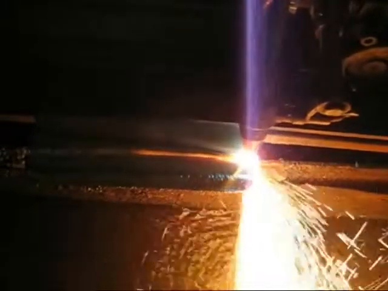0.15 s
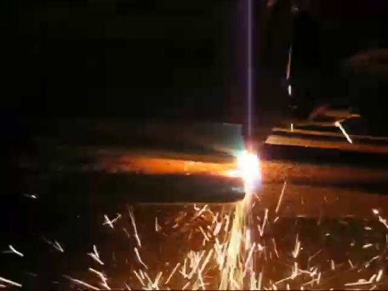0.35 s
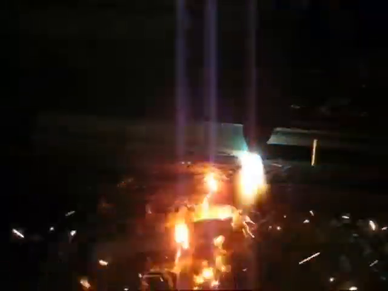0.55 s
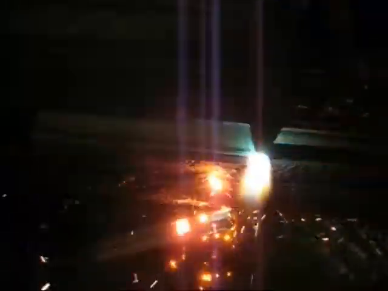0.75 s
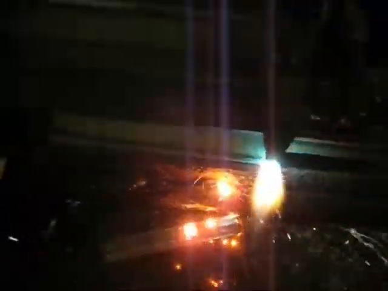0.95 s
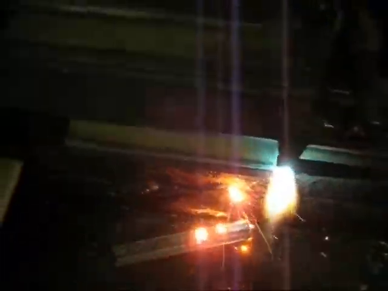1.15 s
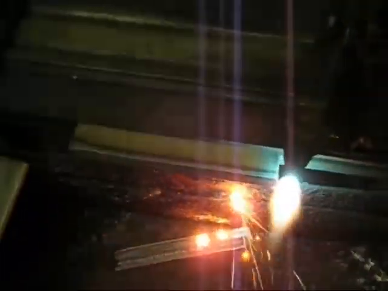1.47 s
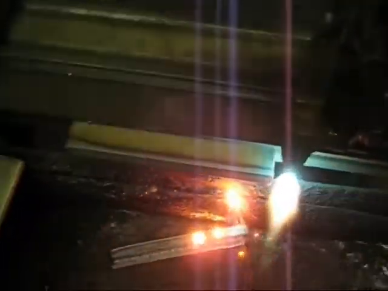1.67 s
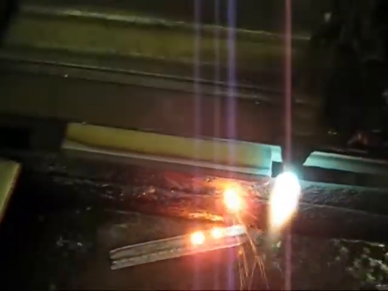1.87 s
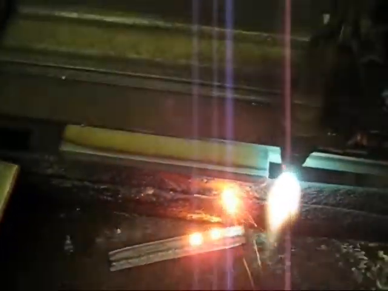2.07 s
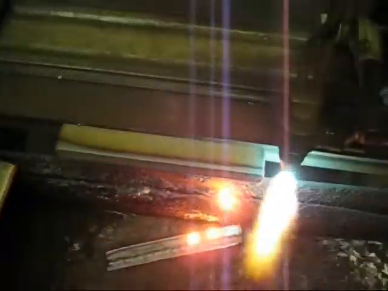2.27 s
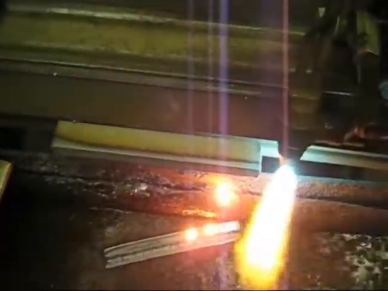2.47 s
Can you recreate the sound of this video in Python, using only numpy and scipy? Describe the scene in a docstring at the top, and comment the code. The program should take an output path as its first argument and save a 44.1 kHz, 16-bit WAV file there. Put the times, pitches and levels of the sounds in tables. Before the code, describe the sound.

A cutting torch's oxygen jet hisses close by, dense, bright and breathy, rising slightly in the first 0.15 seconds. After a faint tick at 0.4, a steel offcut clanks down at about 0.5 in a tight cluster of dull ringing blows, with a short workshop tail. The hiss holds steady, its whistly colour shifting, over barely audible low hum. Around 2.25 it shuts off into a darker, fluttering flame roar until the end.

```python
"""An oxy-fuel torch in a workshop, heard by a single microphone. First an oxygen jet hisses through nozzle
and kerf (filtered noise, resonances, echoes) over a faint wavering hum and rumble. From 0.4 s the cut-off
steel piece hits the floor in a burst of blows (ringing modes, noise cracks, room tail). Near 2.24 s the jet is
shut and the open flame roars (fluttering noise). Gain control turns down whatever rises over its threshold."""
import sys
import numpy as np
from scipy import signal
from scipy.fft import rfft, irfft, next_fast_len
from scipy.io import wavfile
from scipy.ndimage import uniform_filter1d

SR = 44100
rng = np.random.default_rng(int(sys.argv[2]) if len(sys.argv) > 2 else 0)


def volts_from_db(level):
    """Convert decibel levels to linear amplitude ratios."""
    exponent = np.asarray(level, float) / 20
    return 10 ** exponent


def digitize_waveform(pressure):
    """Quantize a signal to 16-bit integers and store it at the path in sys.argv[1].

    Rows of a 2-D input are taken as channels; values are limited to [-1, 1].
    """
    field = np.atleast_2d(pressure).T
    bounded = np.clip(field, -1, 1)
    quanta = np.round(bounded * 32767).astype(np.int16)
    wavfile.write(sys.argv[1], SR, quanta)


N = 114660
T = np.arange(N) / SR


def set_rms(x, rms_db):
    """Scale to an rms level."""
    return x * volts_from_db(rms_db) / np.sqrt(np.mean(x ** 2))


def curve(table, col=1):
    """A table column joined linearly in time."""
    rows = np.array(table, float)
    return np.interp(T, rows[:, 0], rows[:, col])


def walk(rate_hz):
    """Random levels held 1 / rate_hz and slewed twice; spread near 1."""
    hold = max(int(SR / rate_hz), 1)
    steps = np.repeat(rng.standard_normal(N // hold + 1), hold)
    slewed = uniform_filter1d(uniform_filter1d(steps, hold), hold)
    return 1.3 * slewed[:N]


def ramp(start_s, length_s):
    """A smooth step from 0 to 1."""
    return np.sin(np.pi / 2 * np.clip((T - start_s) / length_s, 0, 1)) ** 2


def decay(t, t60_s):
    """Exponential decay by 60 dB in t60_s."""
    return np.exp(-np.log(1000) * t / t60_s)


def ring(x, hz, width_hz):
    """A resonance with gain 1 at its centre."""
    return signal.lfilter(*signal.iirpeak(hz, hz / width_hz, SR), x)


def ring_twice(x, hz, width_hz):
    """Two equal resonances in series: steeper skirts, each width_hz wide."""
    return ring(ring(x, hz, width_hz), hz, width_hz)


def turbulence(spectrum, shared_db, own_db, gust_hz, flicker_hz):
    """Noise of rms near 1 in half-octave-spaced bands that gust together and flicker alone."""
    rows, size = np.array(spectrum, float), next_fast_len(N)
    octave = np.log2(np.arange(size // 2 + 1) * SR / size + 1)
    top_octave = np.log2(rows[-1, 0])
    shape_db = np.interp(octave, np.log2(rows[:, 0]), rows[:, 1])
    shaped = rfft(rng.standard_normal(size)) * volts_from_db(shape_db)
    gust_db, out = shared_db * walk(gust_hz), 0
    for centre in np.arange(3.5, top_octave + 1, .5):
        overlap = np.clip(1 - abs(octave - centre) * 2, 0, 1)
        band = irfft(shaped * overlap, size)[:N]
        out = out + band * volts_from_db(gust_db + own_db * walk(flicker_hz))
    return set_rms(out, 0)


def jet():
    """Turbulent hiss with breathy resonances, its treble mirrored by the steel; it dies when the valve shuts."""
    # hiss spectrum: f/Hz, relative density/dB per Hz
    hiss_spectrum = [(53, -62), (90, -44), (110, -25), (336, -17), (615, -15), (671, -10.5), (1230, -9),
                     (1590, -7), (1890, -3), (2850, -5.5), (3610, -1.5), (4890, -5.5), (6070, -3),
                     (9000, -4), (11100, -7), (13500, -11), (15700, -20.5)]
    # jet loudness: t/s, level/dB before the fixed lift
    jet_level = [(0.0, -27.5), (0.1, -24), (0.14, -21), (0.53, -21), (0.54, -25), (0.64, -20), (1.36, -20),
                 (2.2, -21.5), (2.24, -21.5)]
    # jet resonances: f/Hz, width/Hz of each of two passes, level/dB re unlifted hiss
    whistles = [(1234, 77, -24.5), (2406, 240, -18), (3692, 510, -12.5), (4324, 340, -16.5)]
    # resonances as the torch moves over the work: t/s, then level change/dB of each of the four
    whistle_level = [(0, -16, 0, -18, 7), (.45, -3, 0, -4, 0), (.6, 3, 0, 3, -4), (1.0, 0, 0, 1, -9),
                     (1.35, 6.5, 0.0097, -10, 1), (1.6, -3, 0, 0, 7), (2.2, -3, 0, -2.5, 5.5)]
    # treble balance: t/s, level/dB
    treble_level = [(0, 6), (.35, 0), (.6, 0), (1.2, 0), (1.4, 1.5), (2.2, -0.5)]
    # steel beside the torch: extra path/s, drift spread/s, level/dB re treble
    mirrors = [(.0006, .00005, -15), (.0017, .0001, -16)]
    treble_hz, lift_db = 8000, 2.5
    shut_s, fade_s = 2.235, .068

    hiss = turbulence(hiss_spectrum, shared_db=.45, own_db=.9, gust_hz=30, flicker_hz=16)
    highpass = signal.butter(1, treble_hz, "high", fs=SR, output="sos")
    treble = signal.sosfiltfilt(highpass, hiss)
    out = hiss + treble * (volts_from_db(curve(treble_level)) - 1)
    for k, (hz, width_hz, tone_db) in enumerate(whistles):
        tone = ring_twice(rng.standard_normal(N), hz, width_hz)
        change_db = curve(whistle_level, col=k + 1) + 1.2 * walk(15)
        out = out + set_rms(tone, tone_db) * volts_from_db(change_db)
    for lag_s, drift_s, echo_db in mirrors:
        delay_s = lag_s + drift_s * walk(2.8)
        out = out + volts_from_db(echo_db) * np.interp(T - delay_s, T, treble)
    return out * volts_from_db(curve(jet_level) + lift_db) * (1 - ramp(shut_s, fade_s))


def shop():
    """Narrow noise bands make a wavering hum and a fainter higher one, over faint rumble."""
    # rumble spectrum: f/Hz, relative density/dB per Hz
    rumble_spectrum = [(12, 2), (25, 0), (50, 13), (100, -9), (200, -30)]
    hum_db, overtone_db, rumble_db = -60, -82, -68

    hum = ring_twice(rng.standard_normal(N), hz=76, width_hz=8.5)
    overtone = ring(rng.standard_normal(N), hz=123, width_hz=4.9)
    rumble = turbulence(rumble_spectrum, shared_db=.5, own_db=.5, gust_hz=5, flicker_hz=5)
    return set_rms(hum, hum_db) + set_rms(overtone, overtone_db) + volts_from_db(rumble_db) * rumble


def piece():
    """Each blow is a short rattle that rings the steel's modes and cracks; the workshop adds a tail."""
    # blows of the piece: t/s, relative ring drive/dB, crack level/dB before the high-pass
    blows = [(0.4, -29.5, -38), (0.514, -16.5, -12.5), (0.525, -21.5, -19), (.536, -25, -15),
             (.557, -23, -20), (.588, -24.5, -30)]
    # modes of the piece: f/Hz, relative level/dB, t60/s
    modes = [(169, -15.5, 0.27), (322, -4.5, 0.25), (367, -7.5, 0.13), (410, -2.5, 0.21), (453, 0.5, 0.19),
             (500, -1, 0.18), (576, 0, 0.08), (697, -3, 0.14), (750, 4.5, 0.064), (1204, 3, 0.06),
             (1304, 1, 0.14), (1434, 0, 0.17), (1732, 5, 0.11), (2070, 0, 0.039)]
    contact_s = .0015  # time constant of the rattle
    crack_hz, crack_width_hz, crack_t60_s = 1670, 7000, .11  # width of each of two passes
    low_hz = 274  # the small piece radiates little below this
    room_t60_s, room_db = .81, -7.5

    push, crack_envelope, t = np.zeros(N), np.zeros(N), T[:SR]
    for start_s, ring_db, crack_db in blows:
        since = np.clip(T - start_s, 0, None)
        struck = since > 0
        rattle = (1 + rng.standard_normal(N)) * np.exp(-since / contact_s) * struck
        push += volts_from_db(ring_db) * rattle / np.sqrt(np.sum(rattle ** 2))
        crack_envelope += volts_from_db(crack_db) * decay(since, crack_t60_s) * struck

    body = np.zeros(SR)
    for k, (hz, mode_db, t60_s) in enumerate(modes):
        sign = (-1) ** k
        body += sign * volts_from_db(mode_db) * decay(t, t60_s) * np.sin(2 * np.pi * hz * t)
    ringing = signal.fftconvolve(push, body)[:N] / 2

    noise = ring_twice(rng.standard_normal(N), crack_hz, crack_width_hz)
    out = ringing + crack_envelope * set_rms(noise, 0)
    highpass = signal.butter(3, low_hz, "high", fs=SR, output="sos")
    out = signal.sosfilt(highpass, out)

    tail = rng.standard_normal(SR) * decay(t, room_t60_s)
    tail = tail / np.sqrt(np.sum(tail ** 2))
    return out + volts_from_db(room_db) * signal.fftconvolve(out, tail)[:N]


def flame():
    """The open flame: turbulent noise, darker and rougher than the jet, with fluttering resonances."""
    # roar spectrum: f/Hz, relative density/dB per Hz
    roar_spectrum = [(24, -47), (40, -33), (171, -13), (290, -16.5), (556, -14.5), (917, -7), (1670, -11),
                     (1900, -5), (2500, -8), (3290, -9), (5440, -10), (10200, -9.5), (16000, -20)]
    # flame resonances: f/Hz, width/Hz, level/dB re roar
    flame_rings = [(73, 18, -31.5), (287, 30, -18), (887, 65, -13.5), (1470, 210, -10.5), (3340, 270, -13)]
    on_s, rise_s, flame_db = 2.255, .051, -19

    roar = turbulence(roar_spectrum, shared_db=.9, own_db=1.1, gust_hz=70, flicker_hz=25)
    for hz, width_hz, tone_db in flame_rings:
        tone = ring(rng.standard_normal(N), hz, width_hz)
        roar = roar + set_rms(tone, tone_db) * volts_from_db(1.5 * walk(40))
    return roar * volts_from_db(flame_db) * ramp(on_s, rise_s)


def scene():
    """One microphone feeds both channels."""
    mono = jet() + shop() + piece() + flame()
    return np.array([mono, mono])


def gain_control(mono):
    """Power smoothed over 17 ms sets the gain: 1 dB over threshold is turned down by 0.4 dB."""
    smooth_s, threshold_db = .017, -21.5
    keep = np.exp(-1 / (smooth_s * SR))
    power = signal.lfilter([1 - keep], [1, -keep], mono ** 2)
    gain = np.minimum(1, (volts_from_db(threshold_db) ** 2 / (power + 1e-12)) ** .2)
    return mono * gain


def widen(mono):
    """The treble flickers wide: brief slices of time-shifted sound enter left and right in antiphase."""
    patches_per_s, patch_s, patch_db = 7, .046, -8.5
    low_hz, high_hz, width_hz = 5000, 15000, 2200  # lowest and highest centre, slice width

    side, hz = np.zeros(N), np.arange(N // 2 + 1) * SR / N
    shifted = rfft(np.roll(mono, SR // 2))
    for when, where in rng.random((int(patches_per_s * N / SR), 2)):
        centre_hz = low_hz + where * (high_hz - low_hz)
        centre_s = when * N / SR
        window = np.cos(np.pi * np.clip((T - centre_s) / patch_s, -.5, .5))
        in_slice = abs(hz - centre_hz) < width_hz / 2
        side += window * irfft(shifted * in_slice, N)
    side = volts_from_db(patch_db) * side
    return np.array([mono + side, mono - side])


def band_limit(x):
    """A steep low-pass at the top of the band."""
    return signal.sosfilt(signal.butter(12, 15740, fs=SR, output="sos"), x)


def record(dry):
    """Gain control, then the wide treble flicker."""
    finished = widen(gain_control(dry[0]))
    return band_limit(finished)


dry = scene()
out = record(dry)
digitize_waveform(out)
```